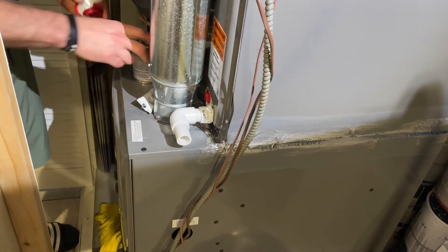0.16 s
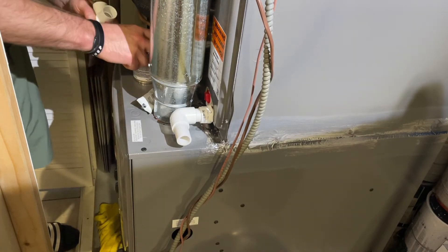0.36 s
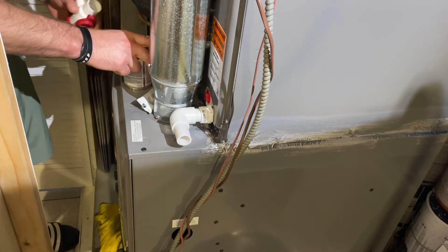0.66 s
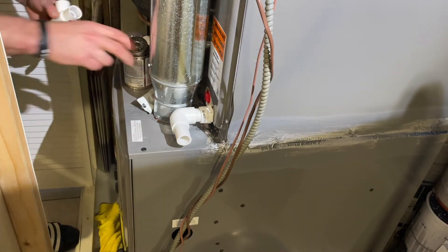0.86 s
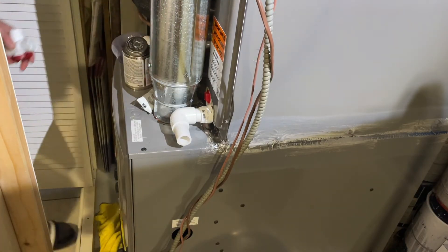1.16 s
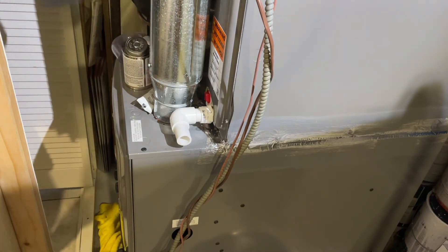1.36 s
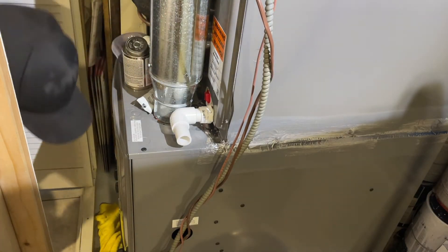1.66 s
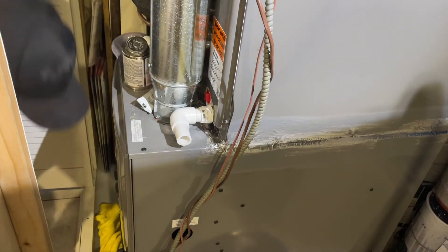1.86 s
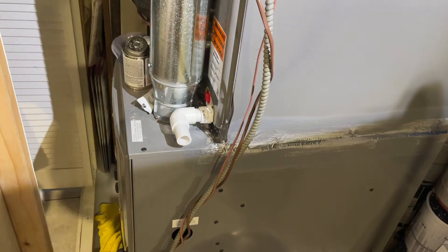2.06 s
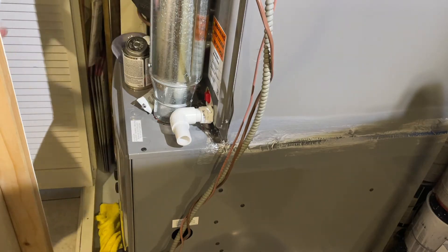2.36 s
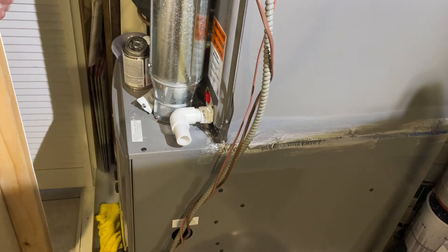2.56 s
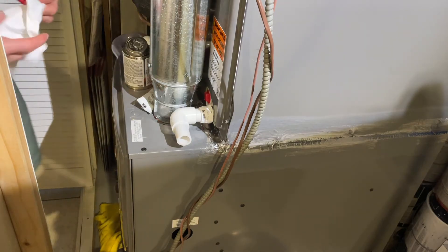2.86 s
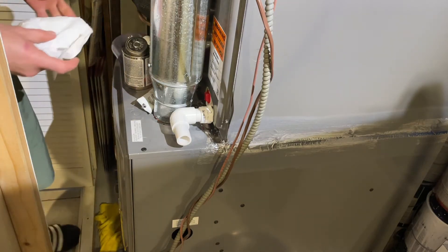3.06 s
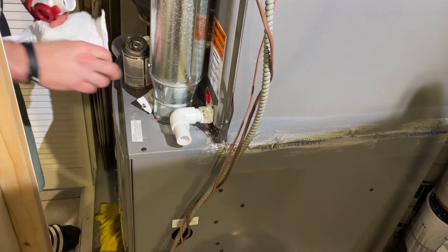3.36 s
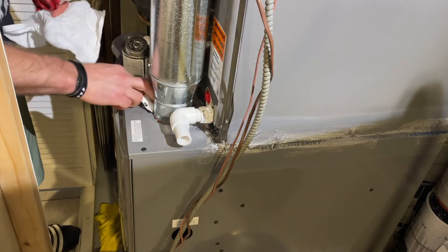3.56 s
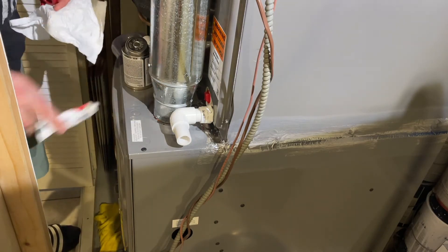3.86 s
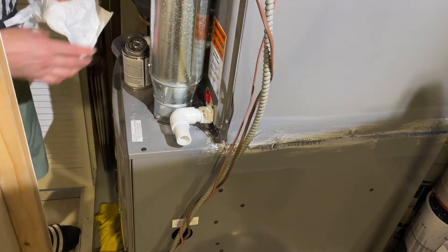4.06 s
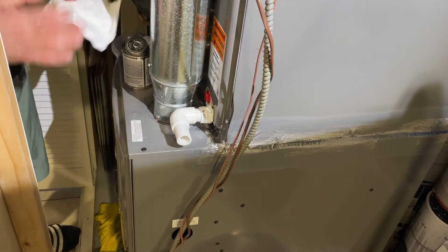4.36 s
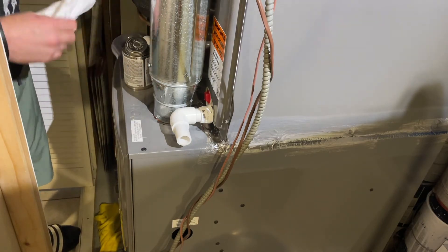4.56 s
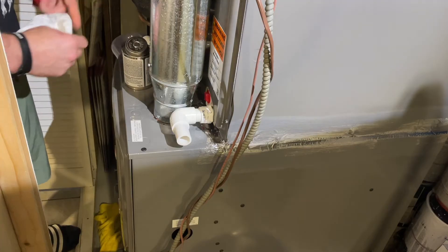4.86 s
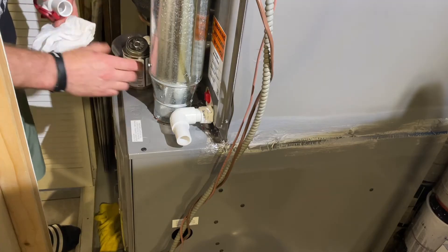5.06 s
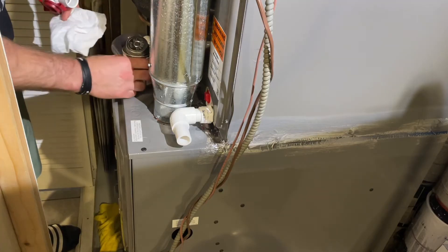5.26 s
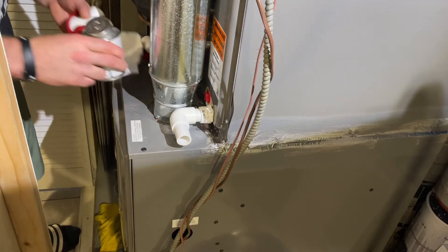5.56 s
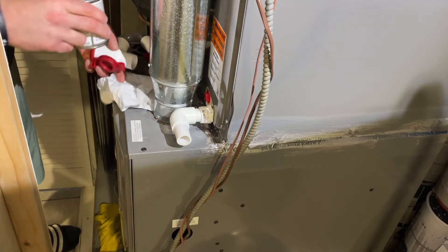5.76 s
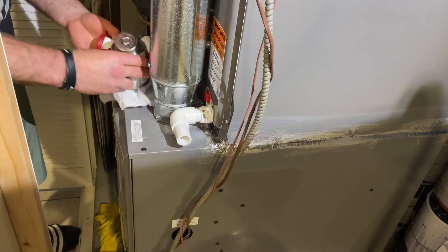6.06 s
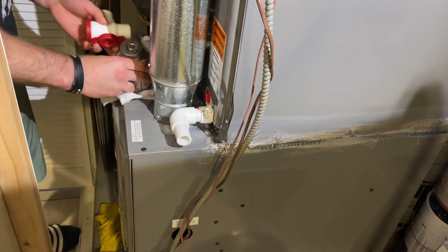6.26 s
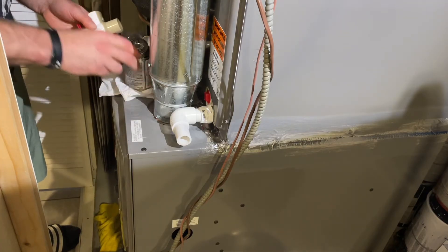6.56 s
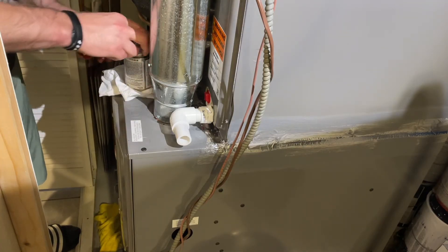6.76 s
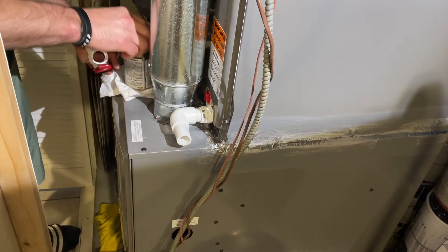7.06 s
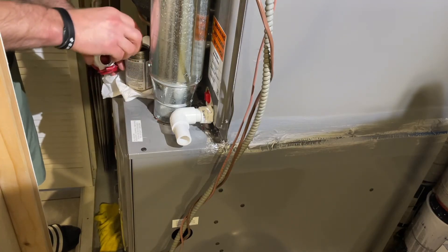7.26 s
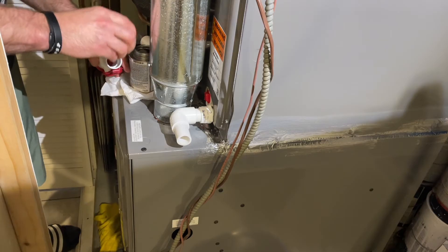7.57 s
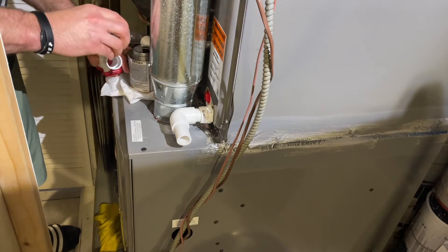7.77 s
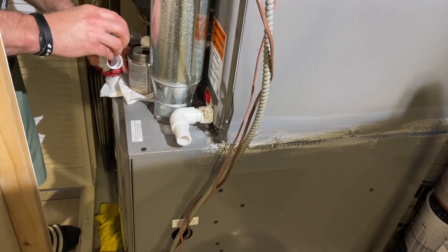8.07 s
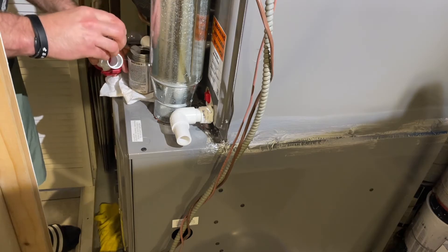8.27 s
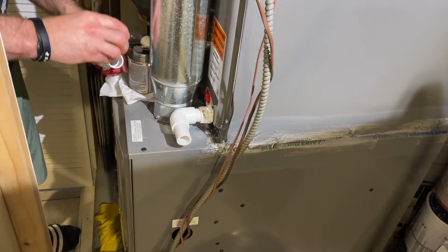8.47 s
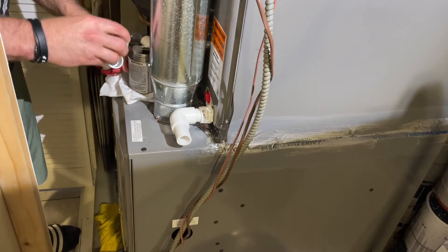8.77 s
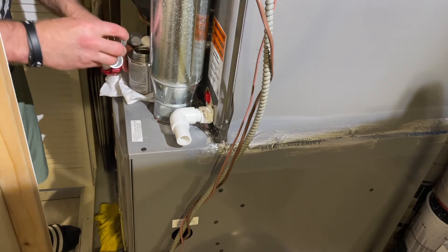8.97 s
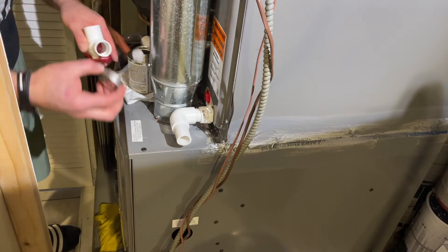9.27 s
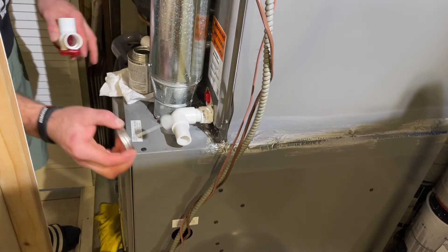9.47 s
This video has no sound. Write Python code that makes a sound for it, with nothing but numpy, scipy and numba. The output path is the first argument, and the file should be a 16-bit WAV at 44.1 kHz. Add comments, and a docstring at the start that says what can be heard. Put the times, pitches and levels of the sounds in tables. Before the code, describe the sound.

Dull thuds on a sheet-metal cabinet, hard plastic clicks and paper rustling in a small utility room, then bright tin-can clinks and faint brushing.

```python
"""Hands at work on a metal cabinet

In a small utility room, things thud on sheet metal, a tin can clinks, is set down, tapped and brushed.
Plastic fittings click, paper towel and sleeves rustle over a low rumble and a faint mains hum.
Thuds, can contacts and clicks start as shaped noise; cabinet and can add decaying modes, clicks a wavelet.
Rustle and rumble are noise in half-octave bands, the brushed can filtered noise, the hum sines.
"""
import sys
import numpy as np
from scipy import signal
from scipy.fft import rfft, irfft, next_fast_len
from scipy.io import wavfile
from scipy.ndimage import uniform_filter1d
from numba import njit

SR = 44100
rng = np.random.default_rng(int(sys.argv[2]) if len(sys.argv) > 2 else 0)


def store_wav(level_fs):
    """Save 16-bit WAV to argv[1]."""
    pcm = np.round(np.clip(np.atleast_2d(level_fs), -1, 1) * 32767)
    wavfile.write(sys.argv[1], SR, pcm.T.astype(np.int16))


N = 424683
BANDS_HZ = 30 * 2 ** np.arange(0, 9.6, .5)
STEP = 32  # samples per control tick
TICKS_S = np.arange(N // STEP + 2) * STEP / SR


def undb(db):
    """Decibels to gain; undb(2 * db) is power."""
    return 10 ** (np.asarray(db) / 20)


def colour(points):
    """Level of each half-octave band in dB, as a column."""
    hz, db = np.transpose(points)
    return np.interp(np.log(BANDS_HZ), np.log(hz), db)[:, None]


def curves(table):
    """Columns of a table at every control tick."""
    s, *columns = np.transpose(table)
    return [np.interp(TICKS_S, s, column) for column in columns]


def to_samples(control):
    """Control curve interpolated to the sample rate."""
    return np.interp(np.arange(N) / STEP, np.arange(len(control)), control)


def walk(rate_hz, rows):
    """Random levels, each held for 1 / rate_hz and smoothed into ramps."""
    hold = max(int(SR / STEP / rate_hz), 1)
    levels = rng.standard_normal((rows, len(TICKS_S) // hold + 1))
    held = np.repeat(levels, hold, axis=1)[:, :len(TICKS_S)]
    return 0.94 * uniform_filter1d(held, hold, axis=1)


def swell(s, db, rise_s, fall_s):
    """Level in dB of one movement; rise and fall each span 20 dB, with a slightly rounded top."""
    away = np.where(TICKS_S < s, (s - TICKS_S) / rise_s, (TICKS_S - s) / fall_s)
    return np.maximum(db - 20 * away ** 1.21, -200)


def noise_bank(power):
    """Two unrelated noises split into half-octave bands, each band following its row of power."""
    size = next_fast_len(N)
    place = 2 * np.log2(np.arange(1, size // 2 + 2) * SR / size / BANDS_HZ[0])
    white = rfft(rng.standard_normal((2, size)))
    out = np.zeros((2, N))
    for k, row in enumerate(power):
        window = np.cos(np.pi / 2 * np.clip(place - k, -1, 1)) ** 2
        band = irfft(white * window, size)[:, :N]
        out += band / band.std() * to_samples(np.sqrt(row))
    return out


def wash(events, treble, body_db, below_db_oct, above_db_oct, crack_db, tick_db, tick_s, attack_s,
         treble_fade):
    """Power of a contact tick over dense modes and near echoes; higher bands start sooner."""
    power = np.zeros((len(BANDS_HZ), len(TICKS_S)))
    khz = BANDS_HZ[:, None] / 1000
    for s, db, hz, treble_db, fade_db, *_ in events:
        first = int(s * SR / STEP)
        t = np.maximum(TICKS_S[first:first + SR // STEP] - s, 0)
        octaves = np.log2(BANDS_HZ[:, None] / hz)
        skirt_db = np.maximum(above_db_oct * octaves, -below_db_oct * octaves)
        body = undb(2 * (db + body_db - skirt_db))
        crack = undb(2 * (db + treble_db + crack_db + colour(treble)))
        tail = undb(-20 * t * fade_db * khz ** treble_fade)
        tick = undb(2 * tick_db) * np.exp(-t / tick_s) * (BANDS_HZ[:, None] > 400)
        attack = (1 - np.exp(-t / attack_s * np.sqrt(khz))) ** 2
        power[:, first:first + len(t)] += (body + crack) * attack * (tail + tick)
    return power


def rings(events, modes, ring_db, reach_oct, attack_s, usual_db, first_db, first_s, throb):
    """Each row rings the modes nearest its centre most; an extra first strength soon dies away."""
    out, t = np.zeros((2, N + SR)), np.arange(SR // 4) / SR
    hz, db, t60_s = np.transpose(modes)[:, :, None]
    chance = rng.random((len(events), 5, len(modes), 1))
    for event, (detune, turn, strength, split, beat) in zip(events, chance):
        s, peak_db, centre_hz, _, fade_db, skirt_db_oct = event
        octaves = np.minimum(np.abs(np.log2(hz / centre_hz)), reach_oct)
        # each mode's strength varies at random in every row
        size_db = peak_db + ring_db + db - skirt_db_oct * octaves + 5 * (strength - .5)
        heard = size_db[:, 0] > size_db.max() - 45
        decay_db = 60 * t / t60_s[heard] * fade_db / usual_db
        extra_db = first_db * np.exp(-(t / first_s) ** 2)
        shape = undb(size_db[heard] - decay_db + extra_db) * (1 - np.exp(-t / attack_s))
        shape = shape * np.minimum((t[-1] - t) / t[-1] * 4, 1)  # last trace fades out
        # each mode is a close pair, at most 1.5 % apart, so it throbs
        throbbing = 1 + throb * np.cos(2 * np.pi * (split * .015 * hz * t + beat))
        pitch_hz = hz * (1 + 0.01 * (detune - .5))
        cycles = pitch_hz[heard] * t + turn[heard]
        wave = (shape * throbbing[heard] * np.exp(2j * np.pi * cycles)).sum(axis=0)
        # a quarter cycle apart at the two spots
        out[:, int(s * SR):][:, :len(t)] += [wave.imag, wave.real]
    return out[:, :N]


# slow level of the rumble: start_s, deep_db, upper_db
RUMBLE_LEVELS = [(0, -62.5, -67.5), (.4, -65, -67.5), (1.2, -66, -68), (2.3, -70, -70), (2.5, -64.5, -60),
                 (2.95, -67.5, -68.5), (3.15, -51.5, -53), (3.43, -64.5, -72.5), (3.55, -49.5, -47.5),
                 (3.75, -55.5, -52), (3.97, -72, -59.5), (4.1, -62.5, -64.5), (4.43, -61, -68),
                 (4.85, -67, -62.5), (5.12, -58, -68), (5.95, -72.5, -68.5), (6.28, -60.5, -65.5),
                 (6.41, -62, -63.5), (6.52, -100, -85), (7.16, -116, -91), (7.35, -85, -71.5),
                 (7.62, -91, -81.5), (7.95, -70, -73), (8.53, -73, -74.5), (9.63, -71.5, -73)]
# band colours of deep rumble, upper rumble and steady room tone: band_hz, level_db
DEEP_COLOUR = [(25, -30), (42, -6.5), (60, -3.5), (100, -2.5), (150, -10.5), (300, -58)]
UPPER_COLOUR = [(70, -41.5), (150, -5.5), (250, -10), (420, -15.5), (650, -21), (1300, -46)]
ROOM_COLOUR = [(30, -110), (120, -99), (500, -95.5), (1400, -101), (4000, -101), (10500, -96.5),
               (15500, -106)]


def rumble():
    """The building, shifting feet and booming panels: a bass that heaves, over steady room tone."""
    deep_db, upper_db = curves(RUMBLE_LEVELS)
    heave_db = 3.5 * walk(9, rows=len(BANDS_HZ))
    deep = undb(2 * deep_db) + panel_boom(against_db=-36, fade_db_s=41)
    upper = undb(2 * upper_db) + panel_boom(against_db=-27, fade_db_s=62)
    heaving = deep * undb(2 * colour(DEEP_COLOUR)) + upper * undb(2 * colour(UPPER_COLOUR))
    return heaving * undb(2 * heave_db) + undb(2 * colour(ROOM_COLOUR))


# steady tones near mains multiples: pitch_hz, level_db (rms)
HUM_TONES = [(59.5, -81), (120, -88.5), (359, -100), (479, -86), (598, -101), (839, -105)]


def hum():
    """Sines near mains multiples, from a motor or transformer; each wavers a little in level."""
    t = np.arange(N) / SR
    waver_db = [1.5 * np.interp(t, TICKS_S, row) for row in walk(6., rows=len(HUM_TONES))]
    # a quarter cycle apart at the two spots
    turns = rng.random((len(HUM_TONES), 1, 1)) + np.array([[0], [1 / 4]])
    out = np.zeros((2, N))
    for (hz, db), w_db, turn in zip(HUM_TONES, waver_db, turns):
        out += np.sqrt(2) * undb(db + w_db) * np.sin(2 * np.pi * (hz * t + turn))
    return out


# band colours of the main rustle, its lower part and its sheen: band_hz, level_db
PAPER_COLOUR = [(900, -34.5), (2000, -10.5), (3000, -5.5), (5000, -5.5), (7500, -9), (11000, -26.5),
                (16000, -54)]
LOWER_COLOUR = [(250, -17), (600, -4.5), (1000, -5.5), (1700, -6.5), (2600, -12.5), (5000, -40)]
SHEEN_COLOUR = [(4000, -39.5), (7500, -0.5), (10500, 0.5), (13000, -9.5), (15500, -8)]


def friction(movements):
    """Power of sliding fibres or bristles: swells with a quick random grain."""
    grain_db = 0.76 * walk(160, rows=1) + 1.0 * walk(25, rows=len(BANDS_HZ))
    grain_db += 1.8 * walk(12, rows=len(BANDS_HZ))  # colour shifts
    grain_db += 2.5 * np.clip(walk(500, rows=1) - 1, 0, 1.5) ** 2  # snaps now and then
    paper = lower = sheen = 0
    for s, db, rise_s, fall_s, lower_db, sheen_db in movements:
        power = undb(2 * swell(s, db, rise_s, fall_s))
        paper = paper + power
        lower = lower + power * undb(2 * lower_db)
        sheen = sheen + power * undb(2 * sheen_db)
    parts = (paper, PAPER_COLOUR), (lower, LOWER_COLOUR), (sheen, SHEEN_COLOUR)
    return undb(2 * grain_db) * sum(power * undb(2 * colour(points)) for power, points in parts)


# paper and cloth movements: peak_s, level_db, rise_s, fall_s, lower_rel_db, sheen_rel_db
RUSTLE_MOVES = [(0.173, -90, .5, 0.7, 7, 3.5), (0.46, -64, 0.069, 0.12, 8, -8.5),
                (0.71, -96, 0.067, 0.16, 25.5, -12), (0.796, -73.5, 0.054, 0.087, 3.5, -1),
                (1.014, -67.5, 0.064, 0.02, -1, 12), (1.132, -72, 0.23, 0.1, 7, -3.5),
                (1.288, -65.5, 0.072, 0.093, -4.5, 6), (1.524, -69, 0.15, 0.35, -18, -1.5),
                (1.7, -85.5, 0.39, 0.31, 6.5, 3), (1.94, -73, 0.098, 0.22, 1, 0),
                (2.118, -73, 0.14, 0.6, -6, -2), (2.196, -74.5, 0.15, 0.93, 4.5, -4),
                (2.38, -73, .25, .3, 3, -4), (2.61, -65.5, 0.26, 0.21, 6.5, -1),
                (2.89, -67.5, 0.13, 0.15, 3.5, -0.5), (3.237, -66.5, 0.06, 0.17, 2.5, -1),
                (3.38, -90, 0.17, .2, 6, -2), (3.559, -61, 0.096, 0.03, 3.5, -27),
                (3.604, -68, 0.064, 0.19, 7, -8), (3.976, -79.5, 0.12, 0.074, 3.5, 1),
                (4.12, -70.5, 0.071, 0.16, 2.5, 2), (4.35, -58.5, 0.12, 0.1, -10, -15),
                (4.564, -55.5, .11, 0.091, -1, -3), (4.86, -73, 0.024, 0.2, 5, -0.5),
                (4.929, -63.5, 0.083, 0.075, 1.5, -2), (5.254, -77, 0.058, 0.06, 4, -0.5),
                (5.326, -89, 0.011, 0.023, 2, 21.5), (5.56, -80.5, 0.44, 1, 0.5, 1),
                (5.926, -89, 0.096, 0.052, -3, -10), (6.246, -68.5, 0.31, 0.29, -1.5, -3),
                (6.46, -73.5, 0.068, 0.072, -2.5, 2.5), (6.757, -87.5, 0.084, 0.049, -15.5, -4),
                (6.87, -86, 0.065, 0.042, -10, 0), (7.019, -81.5, 0.14, 0.1, -29, 2),
                (7.19, -81, 0.027, 0.039, -20.5, -4.5), (9.588, -94, 1, .1, 5.5, -5)]


def rustle():
    """Paper and sleeves: fibres slide, folds shift and creases snap."""
    return friction(RUSTLE_MOVES)


# fittings and paper snaps: start_s, peak_db (before trims), centre_hz, treble_rel_db,
# fade_db_per_100ms (at 1 kHz), contact_rel_db
CLICK_EVENTS = [(.378, -44.5, 450, -43, 4, 5), (.416, -49, 1070, -10, 35, 7),
                (.571, -23.5, 1150, -12.5, 33, -1), (.813, -56, 905, -25, 47, 14),
                (.941, -62, 750, -31, 30, 6), (.986, -51, 1310, 4.5, 18.5, 18),
                (1.067, -45, 890, -34, 43, 11), (1.117, -47, 1260, -12.5, 67, 14.5),
                (1.238, -47.5, 1480, -19, 24, 16.5), (1.347, -57, 800, -25, 45, 3),
                (1.375, -53, 685, -20, 35, 6), (1.905, -58.5, 518, 0.5, 15, -10),
                (2.608, -49.5, 537, -2.5, 18, -2), (3.037, -39, 1410, -35, 31, 18.5),
                (3.0405, -35, 900, -37, 29, 8), (3.0625, -35, 1060, -39, 28.5, 18.5),
                (3.487, -45.5, 2200, 1, 39, 9), (3.532, -49, 2680, -8, 50, 17),
                (3.599, -58, 3000, 2.5, 66, 3), (3.659, -34.5, 1140, -9, 37, 7.5),
                (3.701, -36, 1050, -18.5, 24, 2), (4.224, -39.5, 1088, 5.5, 31, 7),
                (4.238, -32.5, 1030, 1.5, 26, 11), (4.257, -45, 1100, 8.5, 20, 6),
                (4.332, -48, 3900, -18, 25, -6), (4.352, -41.5, 890, -11.5, 22, 9),
                (4.434, -46, 440, -31, 7.5, -5), (4.693, -49, 1600, -11, 24, -10),
                (5.961, -41, 1095, -13, 57, 11.5), (8.439, -81, 487.5, -8, 38.5, 0),
                (8.763, -74, 469, -4, 41, -3.5)]
# treble colour of clicks and thuds: band_hz, level_db
CRACK_COLOUR = [(500, -30), (1500, -9.5), (3000, -8), (5000, -7.5), (7500, -7.5), (10500, -8), (13000, -9),
                (15500, -17)]


def click_noise():
    """Power of the short noise bursts of fittings and snaps of paper."""
    return wash(CLICK_EVENTS, CRACK_COLOUR, body_db=-11.5, below_db_oct=4.3, above_db_oct=17.0,
                crack_db=-6.0, tick_db=1.0, tick_s=0.006, attack_s=.002, treble_fade=0.053)


def click_pops():
    """First contact of hard plastic: a wavelet about one cycle long."""
    out, t = np.zeros((2, N)), np.arange(SR // 50) / SR
    decay_cycles, rise_per_cycle = 1.05, 1.3
    for s, db, hz, *_, pop_db in CLICK_EVENTS:
        wave = undb(db + pop_db) * np.exp(hz * t * (2j * np.pi - 1 / decay_cycles))
        wave = wave * (1 - np.exp(-rise_per_cycle * hz * t))
        out[:, int(s * SR):][:, :len(t)] += [wave.imag, wave.real]
    return out


# blows on the cabinet, several rows may build one: start_s, peak_db (before trims), centre_hz,
# treble_rel_db, fade_db_per_100ms (at 1 kHz), skirt_db_per_oct
THUD_EVENTS = [(0.446, -27, 218, -15, 27, 9), (0.413, -44.5, 1140, -40, 36, 38),
               (0.508, -38.5, 575, -49.5, 26, 30.5), (0.569, -14.5, 410, -19.5, 22, 14),
               (0.572, -18, 150, -40, 31.5, 10.5), (0.584, -25, 159, -31, 50, 1),
               (0.601, -17, 137, -40.5, 55, 4.5), (1.066, -48.5, 484, -29, 24, 8),
               (1.238, -52.5, 1200, -40, 32, 7), (1.119, -40, 266, -16, 25, 15),
               (3.038, -24, 306, -22.5, 31, 7.5), (3.04, -44.5, 1400, -40, 24, 13),
               (3.062, -37, 305, -8, 19, 3), (3.47, -25, 233, -24, 36, 17), (3.489, -28, 171, -43, 36, 4),
               (3.534, -34, 373, -31, 24, 25), (3.597, -48, 138, -22, 24, 6),
               (3.661, -23.5, 255, -33.5, 37, 10), (3.699, -28, 382, -29.5, 39, 5.5),
               (3.706, -31.5, 1130, -40, 41, 27), (4.24, -39, 1044, -43, 29, 15),
               (5.012, -36.5, 222, -15.5, 25, 14), (5.262, -43.5, 216, -35, 21, 8),
               (5.808, -42.5, 360, -40, 20.5, 16.5), (5.839, -47, 155, -31, 32, 25),
               (5.965, -35.5, 450, -0.5, 35, 22)]


def thud_noise():
    """Power of the dull burst as something lands on sheet metal."""
    return wash(THUD_EVENTS, CRACK_COLOUR, body_db=-15.0, below_db_oct=21, above_db_oct=10.1,
                crack_db=-17, tick_db=-1.5, tick_s=0.0054, attack_s=0.0045, treble_fade=0.11)


def panel_boom(against_db, fade_db_s):
    """Power of the slow bass that blows leave in the big panels, summed over the rows."""
    power = 0
    for s, db, *_ in THUD_EVENTS:
        t = np.maximum(TICKS_S - s, 0)
        power = power + undb(2 * (db + against_db - fade_db_s * t)) * (1 - np.exp(-t / .04)) ** 2
    return power


# cabinet modes: pitch_hz, level_rel_db, t60_s (at a 28 dB per 100 ms fade)
CABINET_MODES = [(147.1, -3, 0.45), (172, -4.5, 0.42), (214.3, -0.5, 0.17), (242, -1.5, 0.25),
                 (312.2, -14, 0.078), (406.4, 3.5, 0.12), (451, -4.5, 0.19), (533, -10, 0.2),
                 (587, 2.5, 0.15), (669, -1, 0.15), (746, -3.5, 0.067), (812, -3.5, .12), (885, -2, 0.1),
                 (1044, -2, 0.1), (1140, 2, 0.12), (1265, -4.5, .12), (1560, -9, 0.1)]


def cabinet_ring():
    """Sheet-metal panels ring as decaying modes after a blow."""
    return rings(THUD_EVENTS, CABINET_MODES, ring_db=-9.5, reach_oct=4., attack_s=0.0013, usual_db=28,
                 first_db=1.8, first_s=.03, throb=0.55)


# clinks, the can set down, and taps on it; several rows may build one contact: start_s,
# peak_db (before trims), centre_hz, treble_rel_db, fade_db_per_100ms (at 1 kHz), skirt_db_per_oct
CAN_CONTACTS = [(5.012, -49, 3630, -45, 46, 128), (5.016, -62, 1230, -35, 31, 65),
                (5.215, -72, 3760, -36, 23.5, 63), (5.243, -59, 1960, -30, 26, 83),
                (5.244, -68, 3760, -30, 25, 92), (5.242, -64, 5740, -31, 35, 90),
                (5.256, -67, 4865, -30, 37, 90), (5.305, -53, 1014, -40, 3, 83),
                (5.33, -48, 1030, -45, 21, 83), (5.302, -64, 3460, -30, 50, 90),
                (5.326, -56, 3700, -30, 67, 110), (5.327, -70, 5450, -30, 72, 123),
                (5.96, -27.5, 1170, -22.5, 56, 24), (5.965, -20.5, 935, -34, 19.5, 48),
                (5.962, -40, 3260, -35, 18, 70), (5.963, -43, 5500, -35, 24, 71),
                (6.87, -67.5, 3740, -15, 39.5, 62), (7.186, -66, 4500, -15, 58, 36.5),
                (7.209, -37, 1434, 1, 34.5, 49.5), (7.2095, -42, 5760, -30.5, 19, 41.5),
                (7.2097, -34, 10500, -28.5, 28.5, 54.5), (7.21, -39.5, 4140, -27.5, 28.5, 45.5),
                (7.212, -43.5, 1870, -28.5, 27.5, 62.5), (7.224, -45, 1500, -3, 17, 17.5),
                (7.388, -33.5, 1560, -3, 32.5, 29), (7.389, -43.5, 5000, -32, 21.5, 32.5),
                (7.3895, -22.5, 9650, -35, 34.5, 73.5), (7.39, -39, 3000, -30, 21.5, 61.5),
                (7.392, -48, 1960, -27, 26, 60.5), (7.399, -38, 1470, -12.5, 19, 14.5),
                (7.55, -29, 1404, -14, 32.5, 28), (7.552, -36.5, 910, -33, 13.5, 48),
                (7.5505, -35.5, 10190, -30.5, 33, 60.5), (7.551, -37, 4100, -32.5, 28, 48),
                (7.553, -47, 1900, -31, 28, 49.5), (7.642, -59, 2720, -40, 13, 108),
                (7.56, -30, 1335, -18, 19.5, 31.5), (7.893, -53, 1390, -27, 43, 34),
                (9.008, -64, 1450, -32, 40, 47)]
# treble colour of a can contact: band_hz, level_db
TIN_COLOUR = [(500, -34), (2000, -37.5), (2700, -36), (3500, -16), (4300, -1), (5500, -6), (7500, -1.5),
              (10000, 2.5), (12000, -6.5), (15500, -18.5)]


def can_contact_noise():
    """Power of the bright contact burst on tin."""
    return wash(CAN_CONTACTS, TIN_COLOUR, body_db=-26.5, below_db_oct=59, above_db_oct=26, crack_db=-8,
                tick_db=13.4, tick_s=0.0016, attack_s=.001, treble_fade=-.05)


# can modes: pitch_hz, level_rel_db, t60_s (at a 27 dB per 100 ms fade when struck)
CAN_MODES = [(214, 5, 0.27), (348, 1, 0.35), (410.4, -3.5, .15), (640, -11, 0.084), (914, -4.5, 0.12),
             (1067, -13.5, 0.2), (1260, -15.5, .12), (1233, -4.5, 0.16), (1250, -11, 0.21),
             (1290, -3.5, 0.13), (1363, 6.5, 0.17), (1425, 0.5, 0.24), (1496, -7.5, .15),
             (1670, -13, 0.095), (1860, -5.5, 0.086), (1936, -6.5, 0.19), (2145, -12.5, 0.077),
             (2560, -7.5, 0.14), (2720, -8, 0.19), (3002, 0, 0.14), (3165, -12, 0.16), (3300, -11, .13),
             (3420, -4.5, 0.14), (3815, -5, 0.14), (4000, -6.5, 0.16), (3870, -4, 0.2), (4400, -6, 0.21),
             (4520, -4.5, 0.12), (4905, -4.5, .15), (5170, -5.5, .12), (5520, -5, .16), (5500, -3.5, 0.15),
             (5600, -4, 0.11), (6100, -8, 0.12), (5800, -11.5, 0.14), (9230, -6, .1), (10200, -4, 0.081),
             (9830, -2.5, 0.11), (10250, -5, .13), (10800, -6, 0.095), (10300, -3.5, 0.092)]


def can_ring():
    """Thin tin wall rings as decaying modes after a contact; the grip soon damps the first strength."""
    return rings(CAN_CONTACTS, CAN_MODES, ring_db=-10, reach_oct=0.85, attack_s=0.0016, usual_db=27,
                 first_db=7.0, first_s=0.02, throb=0.4)


# brush strokes on the can: peak_s, hiss_db, rise_s, fall_s (of the hiss), ring_db, highest_mode_rel_db
BRUSH_STROKES = [(7.902, -78.5, 0.074, 0.061, -61, -14), (8.035, -88.5, 0.037, 0.049, -88, -2),
                 (8.1, -86, 0.06, 0.058, -78.5, -3), (8.211, -90.5, 0.033, 0.059, -84.5, -13),
                 (8.29, -98, 0.093, 0.1, -92, 4), (8.45, -86.5, 0.014, 0.059, -90, 0),
                 (8.54, -89, 0.15, 0.09, -88, 2), (8.768, -84, 0.012, 0.034, -102, -4),
                 (8.83, -86.5, 0.073, 0.058, -86.5, 2), (9.015, -87.5, 0.018, 0.055, -71.5, 3),
                 (9.05, -91, 0.038, 0.091, -89, 4)]


def brush_hiss():
    """Power of the bristles' own hiss, rich in sheen."""
    lower_rel_db, sheen_rel_db = 1.5, 9.5
    return friction([(*row[:4], lower_rel_db, sheen_rel_db) for row in BRUSH_STROKES])


def brushed_can():
    """Bristles catch and slip: noise keeps the can's main modes singing, the highest set per stroke."""
    flutter = undb(4.5 * walk(45, rows=1)[0])
    narrower = 0.83  # ring swell against hiss swell
    out = np.zeros((2, N))
    for hz, mode_db, t60_s in [mode for mode in CAN_MODES if 1300 < mode[0] < 1650]:
        gain = 0
        for s, _, rise_s, fall_s, ring_db, highest_db in BRUSH_STROKES:
            level_db = ring_db + (highest_db if hz > 1470 else mode_db)
            gain = gain + undb(swell(s, level_db, narrower * rise_s, narrower * fall_s))
        resonator = signal.iirpeak(hz, hz * t60_s / 2.17, SR)
        sung = signal.lfilter(*resonator, rng.standard_normal((2, N)))
        out += sung / sung.std() * to_samples(flutter * gain)
    return out


def scene():
    """Two versions of the sound field, as at two spots near the phone."""
    power = rumble() + rustle() + click_noise() + thud_noise() + can_contact_noise() + brush_hiss()
    return noise_bank(power) + hum() + click_pops() + cabinet_ring() + can_ring() + brushed_can()


@njit
def high_pass(x, hz):
    """State-variable high-pass whose edge moves."""
    y, band, low_state, damping = np.empty(len(x)), 0., 0., np.sqrt(2.)
    for i in range(len(x)):
        g = np.tan(np.pi * hz[i] / SR)
        v = (band + g * (x[i] - low_state)) / (1 + g * (g + damping))
        low = low_state + g * v
        band, low_state = 2 * v - band, 2 * low - low_state
        y[i] = x[i] - damping * v - low
    return y


# the two microphone ports: band_hz, likeness_0_to_1, right_phase_rad, left_minus_right_db
PORT_PAIR = [(40, .98, 0, 1), (160, .96, -.3, 3), (340, .7, -.5, 5), (700, .4, -.6, 6), (1100, .25, 1.5, 5),
             (1500, .3, 2.2, 4), (2100, .4, .2, 3), (2900, .55, -.8, 4), (4800, .55, -.1, 3),
             (5700, .5, .2, 4), (6400, .75, 2.2, 2), (6900, .998, np.pi, 0), (8150, .998, np.pi, 0),
             (8550, .8, 3.9, 0), (9900, .8, 5.4, 0), (10500, 1, 2 * np.pi, 0), (11900, 1, 2 * np.pi, 0),
             (12800, .6, 7.8, 0), (13500, .998, 3 * np.pi, 0), (15000, 1, 3 * np.pi, 0),
             (15700, .93, 9.45, 0)]
# treble response of the microphone: band_hz, gain_db
MIC_RESPONSE = [(8400, 1.5), (9300, 1), (10100, 0.5), (11000, -0.5), (12500, -5), (16500, -1.5)]
# moving edge of the bass cut: start_s, edge_hz
BASS_EDGE = [(0, 42), (6.38, 42.7), (6.502, 93.5), (7.101, 205), (7.2, 36), (7.65, 40.6), (7.751, 221),
             (8.301, 42.6), (9.63, 42)]


def record(dry):
    """Right port mixes phase-turned left with its own sound by band; bass and top are cut."""
    size = next_fast_len(N + 4096)
    bins_hz = np.arange(size // 2 + 1) * SR / size
    hz, *columns = np.transpose(PORT_PAIR)
    alike, turn_rad, pan_db = (np.interp(bins_hz, hz, column) for column in columns)
    alike = np.clip(alike, 0, 1)
    left, other = rfft(dry, size) * undb(np.interp(bins_hz, *np.transpose(MIC_RESPONSE)))
    right = alike * np.exp(1j * turn_rad) * left + np.sqrt(1 - alike ** 2) * other
    pair = irfft(np.array([left * undb(pan_db / 2), right * undb(-pan_db / 2)]), size)[:, :N]
    edge_hz = np.interp(np.arange(N) / SR, *np.transpose(BASS_EDGE))
    pair = [high_pass(high_pass(side.copy(), edge_hz), edge_hz) for side in pair]
    top_cut = signal.ellip(8, .2, 70, 16300, fs=SR, output="sos")  # order, ripple dB, stop dB, edge Hz
    return signal.sosfilt(top_cut, pair)


dry = scene()
out = record(dry)
store_wav(out)
```